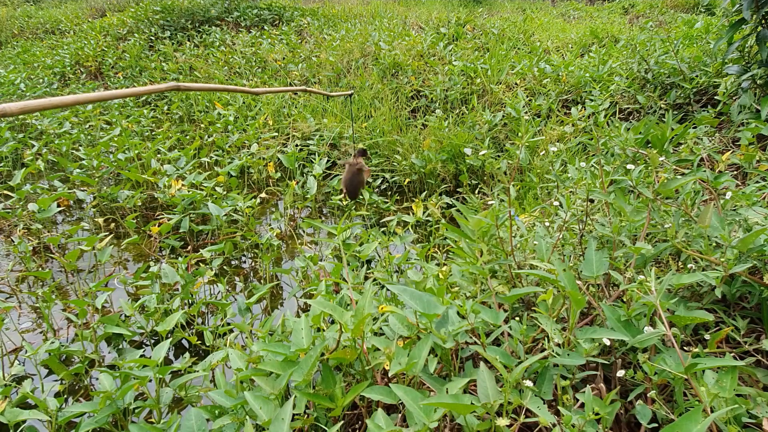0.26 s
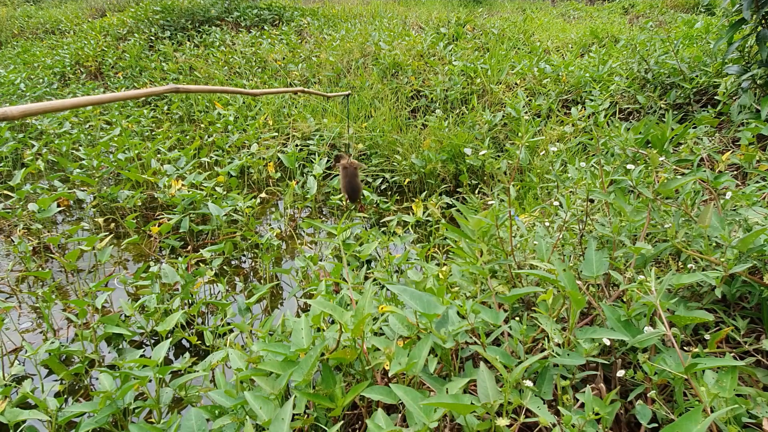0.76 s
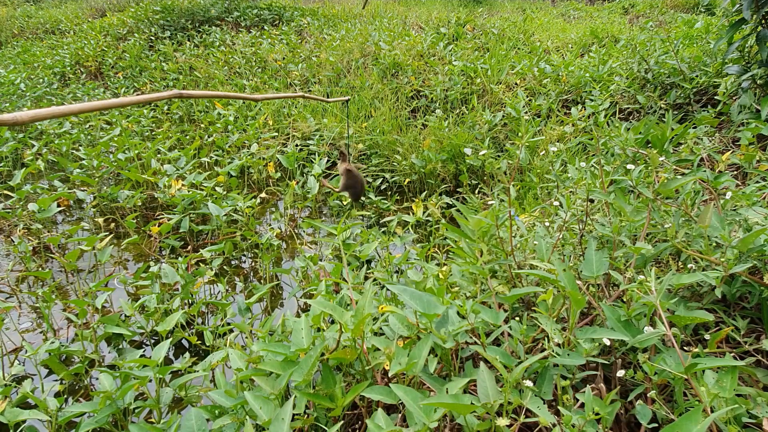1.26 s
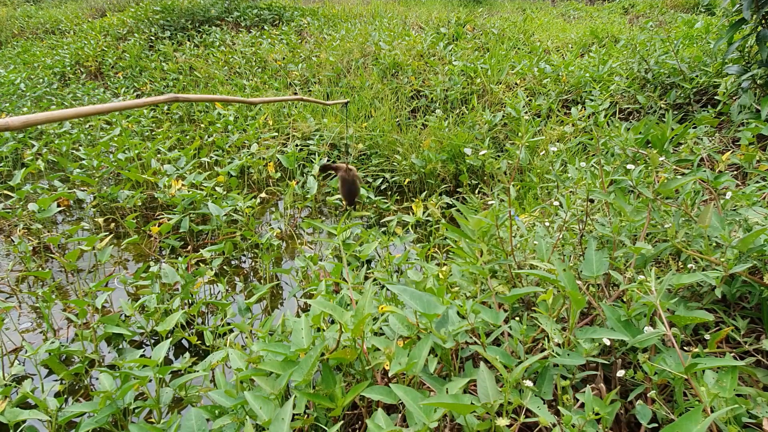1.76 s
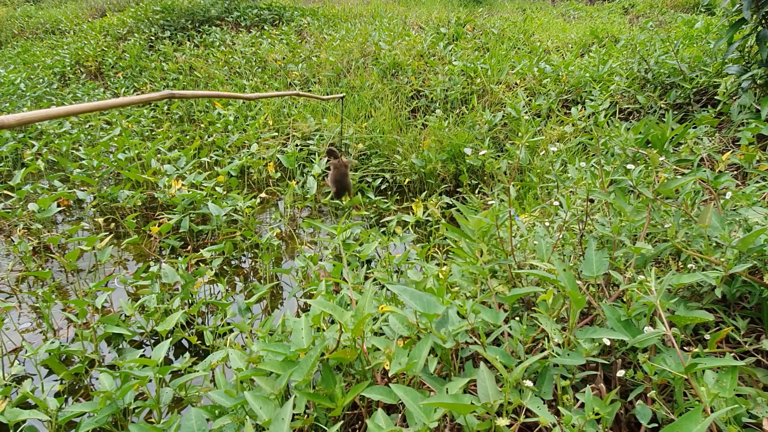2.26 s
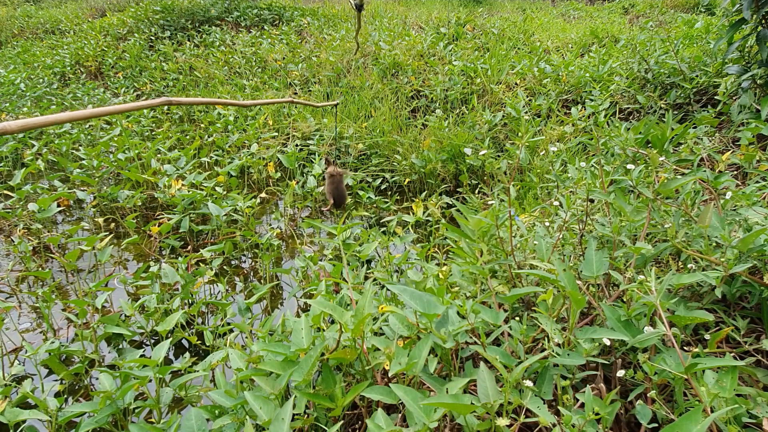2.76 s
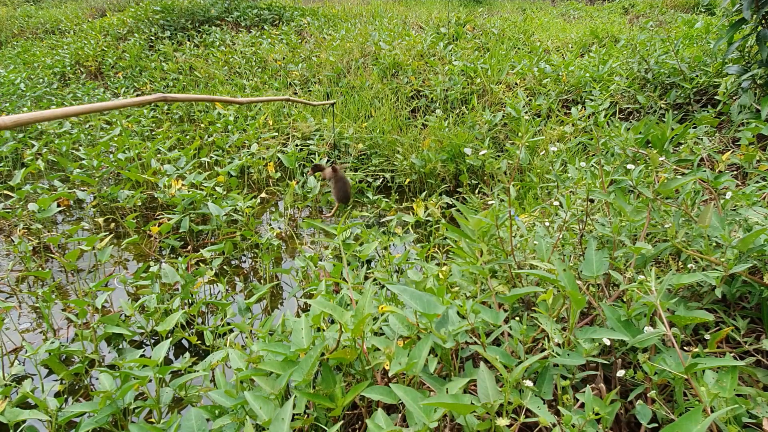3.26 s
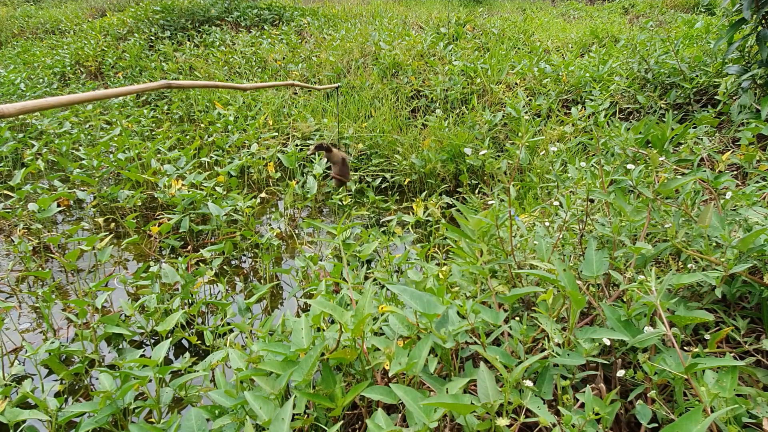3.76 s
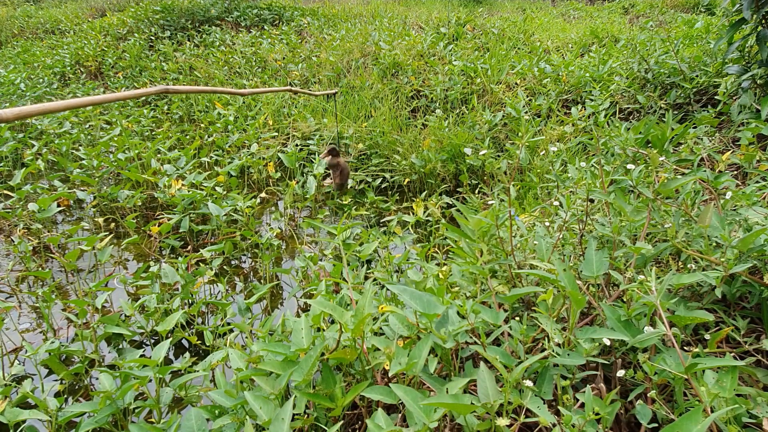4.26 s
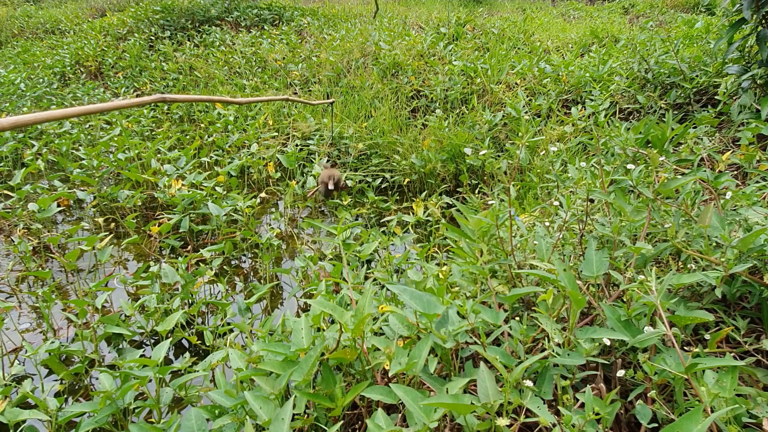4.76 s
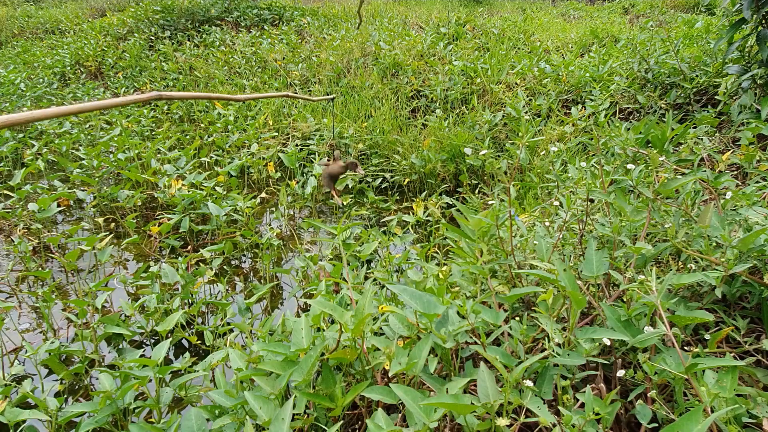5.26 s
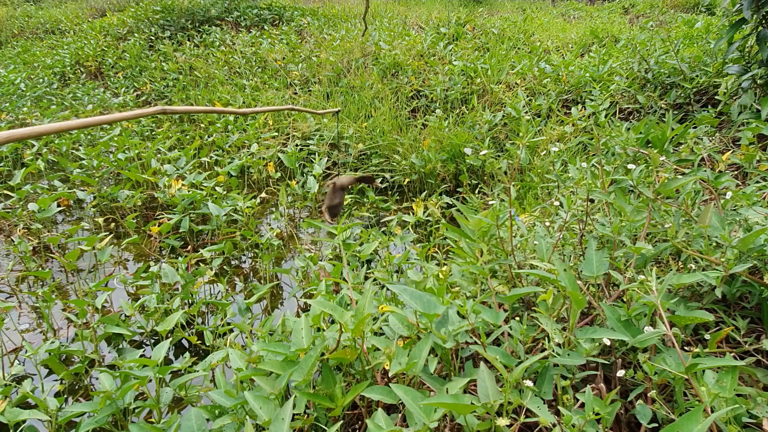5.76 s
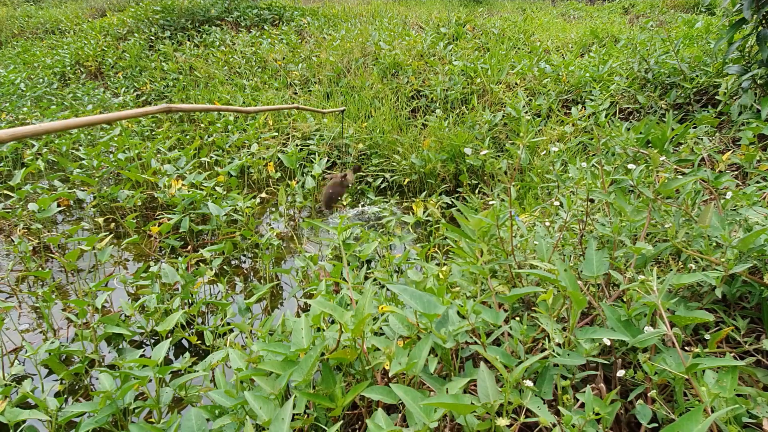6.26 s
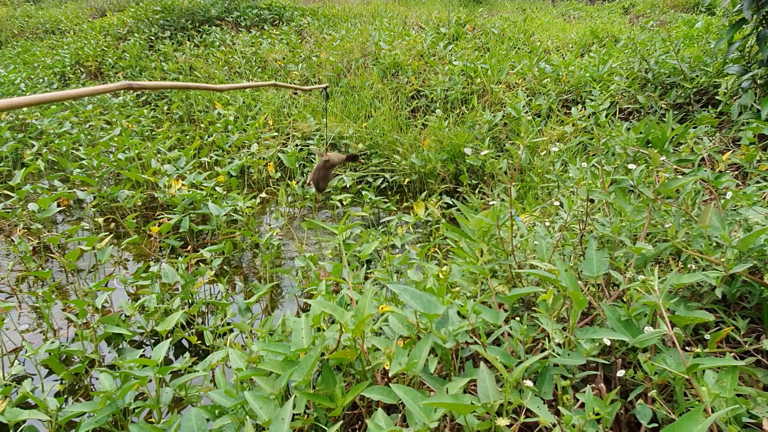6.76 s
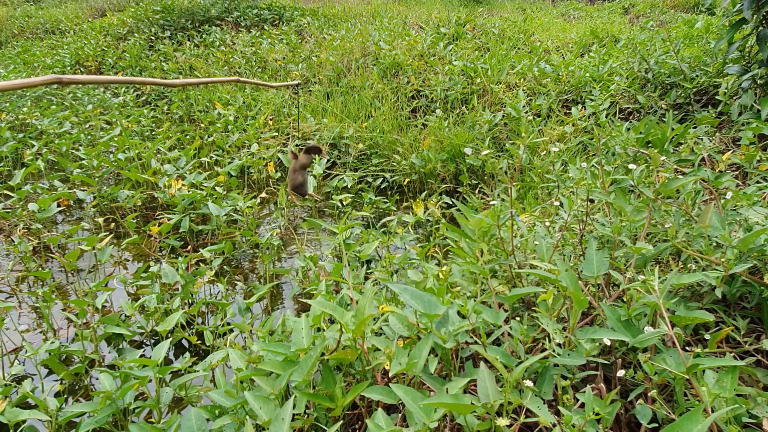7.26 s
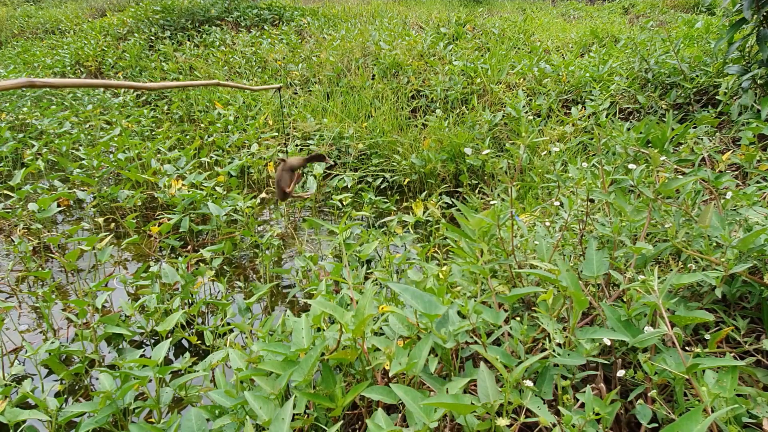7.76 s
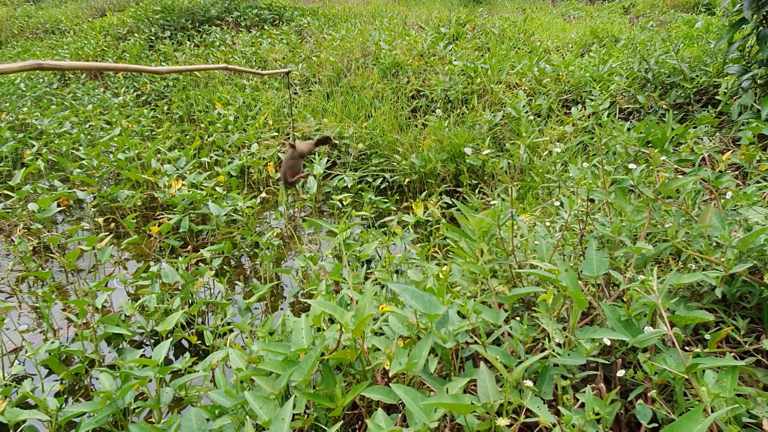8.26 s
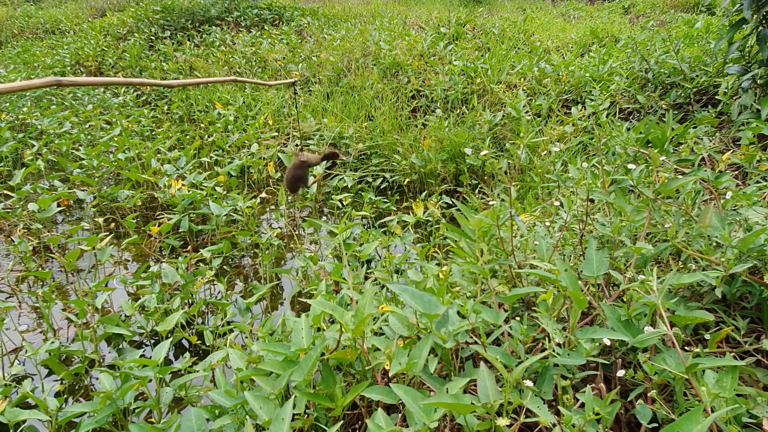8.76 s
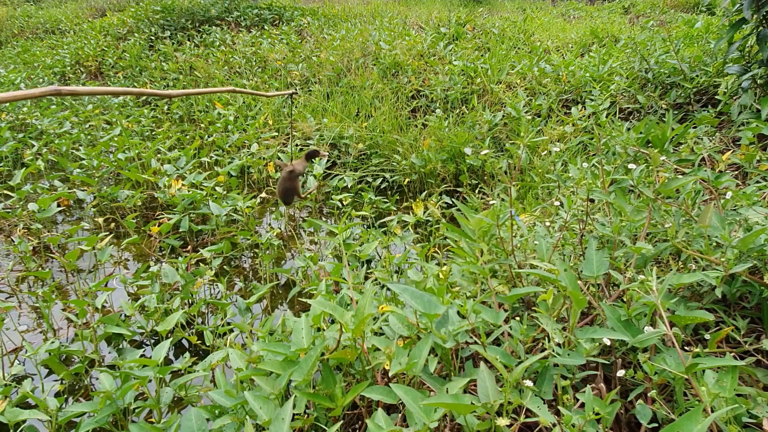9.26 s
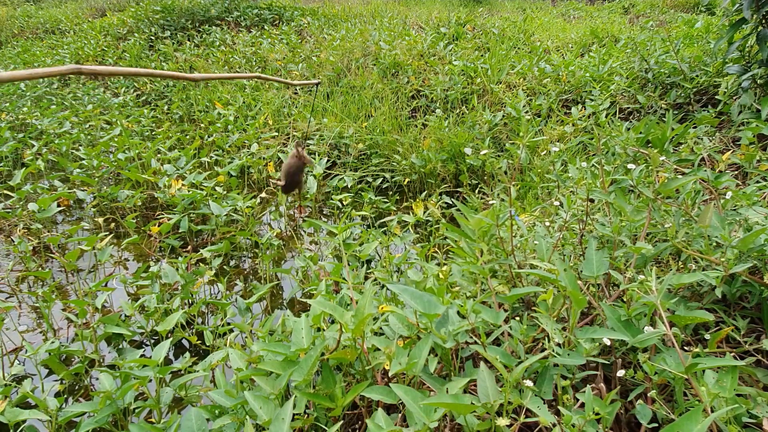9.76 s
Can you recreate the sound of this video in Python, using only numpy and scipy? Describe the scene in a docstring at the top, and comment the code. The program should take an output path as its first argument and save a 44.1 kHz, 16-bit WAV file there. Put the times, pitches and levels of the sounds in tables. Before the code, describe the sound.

A calm outdoor pond: a steady low rumble and drone from a far road, with faint airy hiss, lasts all ten seconds. From 0.1 to 2.3 s a duckling gives tiny, soft, nearly pure twitters, in small clusters. A first quiet peep comes at 2.4 s, then stronger ones from 3.3 s. Between 4.2 and 5.4 s the calls are loudest: piercing, tenth-of-a-second upward chirps with rough cracks, roughly every third of a second. They ease at 5.7 and 6.1 s. At 6.2 to 6.6 s water splashes briefly with slaps, plopping bubbles and pattering droplets. Sparse soft twitters follow, with one modest peep at 7.9 s and more twitters around 8.9 and 9.6 s. Dry leaf ticks and fine rustle appear, sharpest near 4.6 s. Distant engines hum from about 2 s, others accelerating after 6.2 and 8.5 s. Low wind puffs nudge the microphone, strongest near 8.9 s.

```python
"""Soft twitters come first, over a low rumble and a faint hiss; then the duckling peeps in distress.
It dangles on a line over a weedy pond; the two sides of its voice organ sound at once and beat.
Leaves tick as short noise bursts, and one splash is made of slaps, ringing bubbles and spray.
Distant engines are wavering pairs of tones; road, open field and light wind puffs are coloured noise."""
import sys
import numpy as np
from scipy import signal
from scipy.fft import rfft, irfft, next_fast_len
from scipy.io import wavfile

SR = 44100
rng = np.random.default_rng(int(sys.argv[2]) if len(sys.argv) > 2 else 0)


def materialize(psi):
    """Save the field psi as 16-bit PCM at rate SR to the path in sys.argv[1].

    A 1-D psi becomes a single channel; in a 2-D psi each row is a channel.
    """
    bounded = np.clip(np.atleast_2d(psi).T, -1, 1)
    quanta = np.round(bounded * 32767).astype(np.int16)
    wavfile.write(sys.argv[1], SR, quanta)


N = 440559  # length of the scene [samples]

# Loud peeps: (start [s], length [s], time of the top pitch [s], start pitch [Hz], top pitch [Hz],
#   end pitch [Hz], bend of the rise [1 = straight], attack [s], relative level [dB], level change by the end [dB],
#   second voice above the pitch at start, middle, end [Hz], its relative level at start, middle, end [dB],
#   overtone gain [dB], rasp [dB]); a crack shifts the second voice, the overtones and the rasp
PEEPS = [ (2.368, 0.05, 0.052, 2475, 2786, 2830, 1.45, 0.031, -38, -7, 610, 480, 620, -13, -18, -17, -3, -29),
         (3.303, 0.079, .066, 1630, 2926, 2870, 2.6, 0.053, -32.5, -9, 556.6, 600, 560, -15, -40, -28, -3, -42),
         (3.619, .056, 0.036, 2448, 2770, 2560, .4, 0.038, -30, -15, 380, 420, 550, -2, -28, -32, -4, -33),
         (3.668, 0.042, 0.036, 2570, 2826, 2830, .3, 0.018, -31, 0, 560, 400, 650, -26, -33, -35, -6, -38),
         (3.937, .104, .074, 2500, 3240, 2770, 2.5, 0.031, -34, 6, 376, 705, 201, -19, -10, -10, 2, -30),
         (4.260, 0.12, 0.077, 2600, 4105, 3370, 0.69, 0.035, -24, -16.5, 520, 720, 424, -34, -15, -14, -3, -32),
         (4.616, 0.11, .075, 2304, 3668, 3070, 1.25, 0.053, -24, -4, 149.4, 950, 301, -8, -35, -4.5, -6.5, -25.5),
         (4.955, 0.087, .032, 2570, 3527, 3275, 2, 0.019, -30, -4.5, 297, 195, 182, -19, -13.5, -3.5, -1, -30),
         (5.297, 0.021, .002, 2570, 2580, 2620, 1, .005, -42, -1, 444, 500, 450, -9, -21, -21, -6, -30),
         (5.310, 0.1, 0.064, 2367, 3585, 3850, 1.2, 0.048, -27, -17, 450, 620, 700, -9, -32, -21, -8, -32.5),
         (5.723, 0.11, 0.061, 1660, 2945, 2740, 3.2, 0.1, -34.5, -12, 515, 645, 703, -17, -9.5, -28, -7, -41),
         (6.106, 0.095, .083, 2180, 2950, 3000, 3.0, 0.039, -33.5, -6, 376, 520, 916, -13, -10.5, -13, 1.5, -28.5),
         (7.861, 0.094, 0.084, 1910, 2713, 2760, 2.7, 0.059, -36, -4.5, 453, 475, 500, -27, -19, -23, -15, -38)]
# Soft twitters: (start [s], length [s], start pitch [Hz], middle pitch [Hz], end pitch [Hz], relative level [dB])
TWITTERS = [ (0.126, 0.027, 2110, 2420, 2720, -52), (0.224, 0.043, 2050, 2470, 2280, -50.5),
            (.588, 0.043, 2100, 2330, 2500, -60), (.620, .030, 2500, 2430, 2280, -65),
            (.686, .028, 2480, 2280, 2130, -58), (1.200, .032, 2280, 2130, 2130, -63),
            (.642, 0.066, 2290, 2480, 2410, -58), (0.708, 0.053, 2140, 2500, 2550, -52),
            (1.160, 0.06, 2170, 2370, 2240, -63), (1.227, 0.074, 2120, 2450, 2100, -54.5),
            (1.293, 0.053, 2090, 2480, 2720, -51), (1.730, 0.051, 2080, 2420, 2590, -59.5),
            (1.8, 0.057, 2030, 2400, 2570, -53.5), (1.857, 0.058, 2180, 2350, 2900, -50),
            (1.972, 0.043, 1990, 2610, 2840, -47), (2.016, 0.021, 2800, 2380, 1950, -57),
            (2.320, 0.057, 1895, 2270, 2300, -54), (2.714, .040, 2110, 2420, 2830, -53),
            (2.760, 0.048, 2830, 2330, 2030, -63), (2.806, 0.057, 2040, 2320, 2120, -50),
            (3.280, 0.043, 1775, 1807, 1950, -53.5), (3.482, 0.042, 2010, 2440, 2540, -56),
            (3.540, .026, 2030, 2050, 2110, -62), (3.567, 0.038, 2130, 2420, 2680, -50),
            (3.599, 0.049, 2310, 2410, 2450, -50.5), (5.834, 0.046, 2200, 2500, 2320, -54),
            (5.918, .048, 2020, 2410, 2220, -53), (6.599, 0.036, 2250, 2670, 2760, -59),
            (6.715, 0.038, 2130, 2550, 2330, -56.5), (7.155, 0.031, 2050, 2320, 2720, -59.5),
            (7.272, 0.045, 2000, 2530, 2680, -60), (7.351, .046, 2050, 2550, 2760, -56),
            (7.511, 0.027, 1990, 2440, 2870, -57.5), (7.765, 0.027, 2000, 2460, 2860, -57.5),
            (8.785, .043, 1870, 2380, 2580, -57), (8.868, .030, 1830, 1920, 2050, -59),
            (8.891, 0.038, 2020, 2390, 2530, -54.5), (8.936, 0.052, 2210, 2030, 1970, -57),
            (8.97, 0.062, 1930, 2060, 1870, -53.5), (9.503, .040, 2000, 2350, 2452, -61),
            (9.566, .054, 1935, 2383, 2470, -54), (9.620, .020, 2440, 2280, 2070, -63),
            (9.636, .030, 2050, 2100, 2330, -49), (9.654, 0.041, 2260, 2520, 2420, -46.5)]
# The voice cracks within the harder peeps: (time [s], half width [s], loss of the main tone [dB])
CRACKS = [(3.641, .01, 13), (3.959, .007, 13.5), (4.287, 0.012, 9), (4.328, 0.0076, 4), (4.699, .01, 14.5),
          (4.966, 0.009, 9.5), (5.373, 0.0045, 8), (5.789, .018, 3.5)]
# Overtones of the voice: (multiple of the pitch [-], average level before effort and gain [dB])
OVERTONES = [(2, -19.5), (3, -20), (4, -34)]
# Throat and open bill colour the voice: (frequency [Hz], gain [dB])
BILL_COLOUR = [(4200, 0), (5300, -2), (6500, -3), (8000, 3), (9700, 4), (11000, 5.5), (12500, -6),
               (15500, -4)]
# Where the bill points: (time [s], left minus right level [dB], phase lead of the left side [rad])
FACING = [(0, 5, 2.04), (2.4, 3, 1.43), (3.35, 4, 1.04), (3.68, 2, 1.63), (4, 5, 1.6), (4.32, 5, 1.9),
          (4.68, 4, 1.48), (5, 6, 0.8), (5.36, 4, 0.77), (5.8, 3, 1), (6.16, 3, 0.5), (7.9, 0.5, 0.67),
          (10, 2.5, 3)]
# Bubbles of the splash: (time [s], relative level [dB], starting pitch [Hz], left minus right level [dB],
#   time to fall by 60 dB [s], slap level relative to the bubble before colouring [dB])
BUBBLES = [(6.209, -41, 2200, 3, .015, -9), (6.224, -32.5, 3290, 10, 0.024, 0),
           (6.226, -32.5, 2030, 1, 0.019, -18), (6.237, -30.5, 2240, -1, 0.022, -21),
           (6.243, -39, 970, 6, .03, -12), (6.248, -31.5, 3750, 13, 0.0095, -10),
           (6.255, -28, 1154, 4, 0.036, -13), (6.283, -41, 554, 4, 0.069, -12),
           (6.284, -25, 838, 1, 0.036, -8.5), (6.292, -37, 756, -1, 0.095, -10),
           (6.319, -39.5, 2000, -2, 0.017, 10), (6.346, -35, 1800, 4, 0.023, -16),
           (6.367, -36.5, 1210, 7, 0.034, -14), (6.392, -22, 1890, 2.5, 0.013, -4.5),
           (6.410, -34, 3880, 6, 0.014, -12), (6.418, -29, 3140, 3, .008, -18),
           (6.439, -30, 3650, 6, 0.0079, -12), (6.478, -40.5, 1502, 4, 0.068, -14),
           (6.502, -43, 1730, 5, 0.038, -6), (6.569, -41.5, 2070, 6, 0.02, 0.5),
           (6.605, -43, 2640, 12, 0.019, -13)]
# Falling spray: (time [s], relative level [dB])
SPRAY = [(6.19, -47.5), (6.225, -55), (6.27, -46), (6.29, -43), (6.323, -38.5), (6.36, -47), (6.4, -43),
         (6.45, -49), (6.52, -50), (6.58, -55), (6.66, -81)]
# Spectrum of spray and slaps: (frequency [Hz], gain [dB])
SPRAY_COLOUR = [(300, -13), (600, -3.5), (1100, -19), (2000, 1), (4000, -4), (7000, -3), (11000, 3),
                (15000, -4)]
# Leaves and stems tick: (time [s], relative level [dB])
TICKS = [(0.5285, -49), (0.552, -46.5), (0.851, -41.5), (1.0844, -43.5), (1.1368, -51), (1.498, -42),
         (1.868, -46), (2.217, -43.5), (2.415, -44.5), (3.199, -36), (3.683, -42), (3.833, -37.5),
         (4.2294, -43.5), (4.398, -46), (4.588, -45), (4.6424, -29), (4.759, -42.5), (5.4675, -47),
         (5.75, -41), (5.9504, -47), (6.991, -45)]
# Stirring of the leaves: (time [s], level before panning [dB])
RUSTLE = [(0, -69), (.7, -73.5), (1.1, -66), (2, -65), (2.7, -69), (3.6, -65), (4.4, -68), (4.7, -61.5),
          (5.1, -66.5), (6.6, -69.5), (7.3, -68.5), (10, -72)]
# Spectrum of ticks and rustle: (frequency [Hz], gain [dB])
LEAF_COLOUR = [(500, -34.5), (1500, -3.5), (3500, -0.5), (6500, -6), (10000, -3), (15000, -8)]
# Distant engines, one list each:
#   (time [s], average firing rate [Hz], relative level [dB], average second harmonic relative level [dB])
ENGINES = [
    [(2.1, 158, -72, -7), (2.55, 164.7, -65, 5.5), (3.1, 172, -61.5, 1.5), (4, 173.9, -56, -7.5),
     (4.8, 179, -57, -15), (6, 181.3, -55.5, -32.5), (7.7, 186, -65, -31), (8.2, 187, -69, -12)],
    [(3, 135.2, -59.5, -3), (4.2, 146.5, -55.5, -12.5), (5.4, 152.3, -56, -20), (6.1, 154.7, -54.5, -20),
     (6.5, 167.5, -62, 0), (7.4, 168.3, -65.5, 5.5), (8.6, 167.6, -64, -12), (10, 164, -87, 4)],
    [(6.2, 96.55, -62, -23), (6.7, 111.6, -51, -33), (7.2, 134.7, -50.5, -7.5), (7.55, 155.8, -54.5, -9),
     (8, 164, -87, -14)],
    [(8.5, 96.1, -65, -11), (8.9, 106.6, -57.5, -18), (9.4, 120.4, -53.5, -16.5), (10, 136.2, -50, -27)],
]
# Light puffs of wind on the microphone: (time [s], level [dB])
PUFFS = [(0, -73), (.9, -71), (1.1, -62), (1.4, -73), (3.3, -69), (3.7, -65), (4.1, -71), (6.5, -64.5),
         (6.8, -53), (7.3, -56), (8.6, -62), (8.9, -43), (9.2, -55), (9.6, -58), (10, -56)]
# Spectrum of the wind: (frequency [Hz], relative gain [dB])
PUFF_COLOUR = [(15, -19), (30, -1), (55, 3), (85, -2.5), (160, -20), (400, -54), (2000, -100)]
# Drone of the far road: (time [s], average level [dB])
DRONE = [(0, -58.5), (.8, -59), (2.1, -56.5), (2.8, -54.5), (4.1, -54), (5, -54.5), (6.2, -54.5),
         (8.7, -55), (10, -55.5)]
# Tyres on the far road: (time [s], average level [dB])
TYRES = [(0, -67), (1.1, -65), (2, -65.5), (6, -64.5), (7.5, -64), (10, -61.5)]
# Spectra of the surroundings: (frequency [Hz], mid relative gain [dB], side relative gain [dB])
RUMBLE_COLOUR = [(20, -15.5, -25.5), (34.2, -12.5, -21), (61, 8, -8), (92, 9, -12.5), (124, 4.5, -11.5),
                 (180.5, -7, -29), (234, -36.5, -49)]
DRONE_COLOUR = [(89, -28, -31), (148.7, 8.5, -8.5), (206.5, 0.5, -6.5), (246.6, -1, -6.5),
                (333, -7.5, -5.5), (449, -19, -11), (600, -38, -35.5)]
TYRE_COLOUR = [(250, 5.5, -16.5), (417, -0.5, -6.5), (537, 2.5, 2), (660, 2.5, 10), (820, 1.5, 4.5),
               (920, -1.5, 4), (1240, -2.5, 4), (1620, -10.5, -3.5), (2610, -25, -18)]
HISS_COLOUR = [(600, -12.5, -14), (1350, 2.5, 0), (2280, 6, 6), (3480, 1.5, 4), (5200, -5.5, -8),
               (6250, -3, -2), (7300, -61.5, -14), (9000, -35.5, -10), (12000, -32, -30),
               (15500, -20.5, -19)]
# Response of the microphone, with a deep notch: (frequency [Hz], gain [dB])
MICROPHONE = [(6600, 0), (7500, -7.5), (8300, -23), (9000, -35.5), (9800, -26.5), (10800, -22),
              (12000, -17.5)]

SWELL_DB, SWELL_BEND = 20.5, 1.44  # a peep swells by this much during its attack, fast at first
RELEASE_S, RELEASE_DB, RELEASE_DROP_HZ = .011, 28, 760  # as the pressure goes, level and pitch collapse
CRACK_SPLIT_HZ_PER_DB = 25  # the two voices part
# dB that rasp, second voice and overtones gain per dB lost by the main tone
CRACK_RASP, CRACK_SECOND, CRACK_BRIGHT = 0.93, 0.95, .5
# each twitter swells to an early peak (as a share of its length) and fades
TWITTER_PEAK_SHARE, TWITTER_SWELL_DB, TWITTER_FADE_DB = 0.32, 8, 9.5


def duckling():
    """All calls, reaching the two sides with the level and phase of the moment, plus their echo."""
    calls = np.zeros((1, N))
    for s, *shape in PEEPS:
        add(calls, s, peep(s, *shape)[None])
    for s, *shape in TWITTERS:
        add(calls, s, twitter(*shape)[None])
    pan_db, lead = curves(FACING)
    # the complex form of the voice lets its phase be turned
    voice = signal.hilbert(colour(calls[0], BILL_COLOUR), next_fast_len(N))[:N]
    sides = voice * np.exp(1j * np.array([lead, -lead]) / 2)
    return sides.real * pan(pan_db) + weeds(voice.real)


def peep(s, length, top_s, start_hz, top_hz, end_hz, bend, attack_s, db, change_db,
         above_start_hz, above_middle_hz, above_end_hz,
         second_start_db, second_middle_db, second_end_db, bright_db, rasp_db):
    """An arch of pitch that swells, holds and collapses; in a crack the second voice takes over."""
    t, gate = note(length + RELEASE_S)
    release = ramp(t, length, length + RELEASE_S)
    crack_db = sum(loss * np.exp(-((s + t - at) / width) ** 2) for at, width, loss in CRACKS)

    rise_left = (1 - ramp(t, 0, top_s)) ** bend
    after_top = ramp(t, top_s, length) ** 2
    hz = top_hz + (start_hz - top_hz) * rise_left + (end_hz - top_hz) * after_top
    swell_left = (1 - ramp(t, 0, attack_s)) ** SWELL_BEND
    level_db = db - SWELL_DB * swell_left + change_db * ramp(t, attack_s, length)

    marks = [0, length / 2, length]  # start, middle and end
    above_hz = np.interp(t, marks, [above_start_hz, above_middle_hz, above_end_hz])
    second_db = np.interp(t, marks, [second_start_db, second_middle_db, second_end_db])
    voice = syrinx(t, hz - RELEASE_DROP_HZ * release,
                   above_hz + CRACK_SPLIT_HZ_PER_DB * crack_db,
                   second_db + CRACK_SECOND * crack_db,
                   bright_db + CRACK_BRIGHT * crack_db,
                   rasp_db + CRACK_RASP * crack_db)
    return gate * undb(level_db - crack_db - RELEASE_DB * release) * voice


def twitter(length, start_hz, middle_hz, end_hz, db):
    """A short, nearly pure glide whose pitch follows a bow."""
    t, gate = note(length)
    u, peak_s = t / length, TWITTER_PEAK_SHARE * length
    bow_hz = 2 * u * (1 - u) * (2 * middle_hz - start_hz - end_hz)
    hz = start_hz + (end_hz - start_hz) * u + bow_hz
    swell_db = TWITTER_SWELL_DB * (1 - ramp(t, 0, peak_s)) ** 2
    fade_db = TWITTER_FADE_DB * ramp(t, peak_s, length) ** 1.3
    voice = syrinx(t, hz, above_hz=380, second_db=-36, bright_db=-14, rasp_db=-39)
    return gate * undb(db - swell_db - fade_db) * voice


def syrinx(t, hz, above_hz, second_db, bright_db, rasp_db, shimmer_db=2.02):
    """Two membranes beat; their coupling adds sidebands, and strain brings rough overtones and hiss."""
    phase = turn(hz * (1 + .007 * walk(t, 600)))  # the pitch jitters
    beat = turn(above_hz * (1 + .06 * walk(t, 200)))  # the beat wanders
    second, sideband = undb(second_db), undb(-10)
    # the second membrane flaps irregularly
    rasp = undb(rasp_db) * (walk(t, 1300) + 1j * walk(t, 1300)) * np.exp(1j * beat)
    sidebands = sideband * (np.exp(2j * beat) + .5 * np.exp(-1j * beat))
    pair = 1 + second * (np.exp(1j * beat) + sidebands)
    effort = np.clip(hz / 3200, 0, 1) ** 6  # higher calls are pressed harder and are brighter
    # each overtone wavers in strength at random
    overtones = sum(undb(db + 4.5 * walk(t, 70)) * np.exp(1j * round(k) * phase) for k, db in OVERTONES)
    main = (pair + rasp) * np.exp(1j * phase)
    bright = effort * undb(bright_db) * (pair + 4 * rasp) * overtones  # overtones are rougher
    # air forced through the narrow throat hisses in the treble
    treble = signal.butter(2, 9500, "high", fs=SR, output="sos")
    hiss = effort * undb(rasp_db + 12) * signal.sosfilt(treble, rng.standard_normal(len(t)))
    return ((main + bright).imag + hiss) * undb(shimmer_db * walk(t, 250))


def weeds(x, t60=0.21, near_db=-24, far_t60=0.55, far_db=-34):
    """Leaves scatter the sound almost at once; far trees return a faint tail (t60: seconds to fall 60 dB)."""
    t = np.arange(SR // 2) / SR
    near, far = rng.standard_normal((2, 2, len(t))) * (t > .002)
    near_echo = undb(near_db) * unit(near * undb(-60 * t / t60))
    far_echo = undb(far_db) * unit(far * undb(-60 * t / far_t60))
    response = (near_echo + far_echo) / np.sqrt(len(t))
    return signal.fftconvolve(x[None], response, axes=1)[:, :N]


def splash(rise=0.27, attack_s=0.00037, slap_s=0.0041, spray_db=-4):
    """Water slaps, trapped bubbles ring and rise in pitch, spray patters down."""
    rings, slaps = np.zeros((2, 2, N))
    t = np.arange(SR // 8) / SR
    for s, db, hz, pan_db, t60, slap_db in BUBBLES:
        phase = turn(hz * (1 + rise * np.minimum(t / t60, 1)))
        phase = phase + np.array([[.4], [-.4]])  # the two sides differ, which widens the bubble
        envelope = undb(db - 60 * t / t60) * (1 - np.exp(-t / attack_s))
        add(rings, s, envelope * np.sin(phase) * pan(pan_db))
        slap = undb(db + slap_db) * np.exp(-t / slap_s) * rng.standard_normal((2, len(t)))
        add(slaps, s, slap * pan(pan_db))
    spray = grains(600, 5.6, SPRAY_COLOUR)
    t, gate = span(SPRAY)
    spray_gain = undb(curves(SPRAY, t)[0] + spray_db)
    add(rings, SPRAY[0][0], spray[:, :len(t)] * gate * spray_gain * pan(6.7))
    water = rings + droplets() + colour(slaps, SPRAY_COLOUR)
    return water + weeds(water.mean(0), t60=0.1, near_db=-5)


def droplets(count=320, drop_db=4.5, low_hz=1100, high_hz=7500, cycles=22):
    """Small drops of the spray each ring a tiny bubble that rises in pitch and dies away."""
    out, t = np.zeros((2, N)), np.arange(SR // 25) / SR
    for when, size, softness, side in rng.random((count, 4)):
        s = SPRAY[0][0] + when * (SPRAY[-1][0] - SPRAY[0][0])
        hz = low_hz * (high_hz / low_hz) ** size
        # a fall of 60 dB takes this many cycles of the starting pitch
        envelope = undb(-60 * t * hz / cycles) * (1 - np.exp(-t * hz))
        ring = np.sin(turn(hz * (1 + 15 * t))) * envelope
        level_db = curves(SPRAY, s)[0] + drop_db - 16 * softness
        add(out, s, ring * undb(level_db) * pan(8 * side))
    return out


def leaves(tick_db=-3, tick_s=0.0036):
    """Single stems tick as fading noise bursts over a fine rustle of tiny impacts."""
    ticks, t = np.zeros((2, N)), np.arange(SR // 30) / SR
    for s, db in TICKS:
        add(ticks, s, undb(db + tick_db) * np.exp(-t / tick_s) * rng.standard_normal((2, len(t))))
    rustle = grains(220, 2.6, LEAF_COLOUR) * undb(curves(RUSTLE)[0])
    return (colour(ticks, LEAF_COLOUR) + rustle) * pan(11.2)


def grains(rate, spread_db, points):
    """Dense tiny impacts (rate per second) of unequal size, each smeared over a few milliseconds."""
    sizes = undb(spread_db * np.minimum(rng.exponential(size=N), 2))
    hits = (rng.random(N) < rate / SR) * sizes
    envelope = signal.lfilter([1], [1, -np.exp(-1 / (0.0027 * SR))], hits)
    return unit(colour(rng.standard_normal((2, N)) * envelope, points))


def engines(engine_db=1, waver=0.01754, fading_db=3):
    """Only the lowest exhaust harmonics carry this far; the air makes them waver."""
    out = np.zeros((2, N))
    for run in ENGINES:
        t, gate = span(run)
        hz, db, second_db = curves(run, t)
        phase = turn(hz * (1 + waver * walk(t, 25)))
        first = np.sin(phase) * undb(fading_db * walk(t, 12))
        second = np.sin(2 * phase + np.array([[.5], [-.5]]))  # the two sides differ in phase
        second = second * undb(second_db + fading_db * walk(t, 12))
        add(out, run[0][0], gate * undb(db + engine_db) * (first + second))
    return out


def wind():
    """Eddies push on each port of the microphone separately, as low noise in puffs."""
    return unit(colour(rng.standard_normal((2, N)), PUFF_COLOUR)) * undb(curves(PUFFS)[0])


def surroundings():
    """Rumble, drone and tyres of a far road under the hiss of the open field, all noise."""
    rumble = air(RUMBLE_COLOUR, db=-49, flutter_db=1.5)
    drone = air(DRONE_COLOUR, curves(DRONE)[0], flutter_db=0.65)
    tyres = air(TYRE_COLOUR, curves(TYRES)[0], flutter_db=-0.3)
    hiss = air(HISS_COLOUR, db=-68.5, flutter_db=1.2)
    return rumble + drone + tyres + hiss


def air(points, db, flutter_db):
    """A wide, gently fluttering noise with its own mid and side spectra."""
    mid = colour(rng.standard_normal(N), points)
    side = colour(rng.standard_normal(N), points, column=2)
    both = (mid + side * np.array([[1], [-1]])) / mid.std()
    return both * undb(db + flutter_db * walk(np.arange(N) / SR, 9))


def undb(db):
    """Decibels to gain."""
    return 10 ** (np.asarray(db) / 20)


def unit(x):
    """Scale to an average strength (rms) of 1."""
    return x / np.sqrt(np.mean(x ** 2))


def curves(table, t=None):
    """The columns of a table, joined by straight lines in time."""
    s, *columns = np.transpose(table)
    if t is None:
        t = np.arange(N) / SR
    return [np.interp(t, s, c) for c in columns]


def span(table):
    """The sample times that a table covers, and a gate with soft edges."""
    start, end = table[0][0], table[-1][0]
    t = np.arange(int(start * SR), int(end * SR)) / SR
    return t, np.clip(np.minimum(t - start, end - t) / 0.00084, 0, 1)


def note(length):
    """The time since the start of a call, and a gate with soft edges."""
    t = np.arange(int(length * SR)) / SR
    return t, np.clip(np.minimum(t, length - t) / 0.00045, 0, 1)


def ramp(t, start, end):
    """0 before start, 1 after end, straight between."""
    return np.clip((t - start) / max(end - start, 1 / SR), 0, 1)


def add(out, s, x):
    """Mix a sound in at time s."""
    i = max(int(s * SR), 0)
    out[:, i:i + x.shape[1]] += x[:, :max(N - i, 0)]


def pan(db):
    """Left and right gains for a level difference."""
    return undb(np.array([[1], [-1]]) * db / 2)


def colour(x, points, column=1):
    """Filter by a spectrum of (frequency [Hz], gain [dB]) points, joined on a log frequency scale."""
    size, points = next_fast_len(N + 4096), np.array(points)
    hz = np.maximum(np.arange(size // 2 + 1) * SR / size, 1)
    gain_db = np.interp(np.log(hz), np.log(points[:, 0]), points[:, column])
    return irfft(rfft(x, size) * undb(gain_db), size)[..., :N]


def walk(t, rate):
    """A random wander of spread near 1, with this many new values a second."""
    steps = rng.standard_normal(4096)
    return 1.25 * np.interp(t * rate % len(steps), np.arange(len(steps)), steps)


def turn(hz):
    """Phase of an oscillator."""
    return 2 * np.pi * np.cumsum(hz) / SR


def scene():
    """Everything at the pond."""
    return duckling() + splash() + leaves() + engines() + wind() + surroundings()


def record(dry):
    """The microphone's notch, then a steep cut of the highest treble."""
    top_cut = signal.ellip(10, .2, 70, 15700, fs=SR, output="sos")  # ripple [dB], stop depth [dB], edge [Hz]
    return signal.sosfilt(top_cut, colour(dry, MICROPHONE))


dry = scene()
out = record(dry)
materialize(out)
```